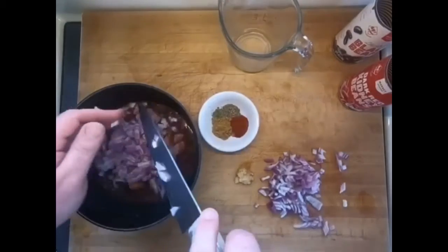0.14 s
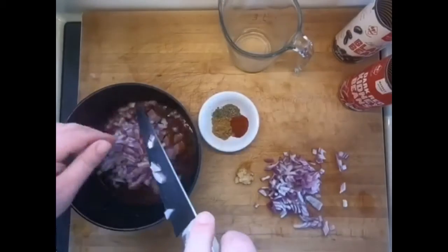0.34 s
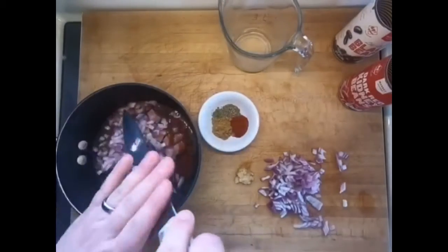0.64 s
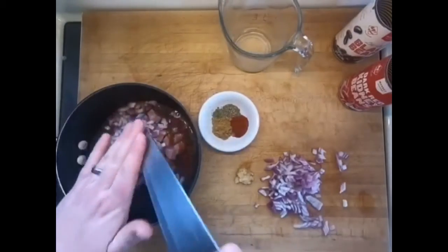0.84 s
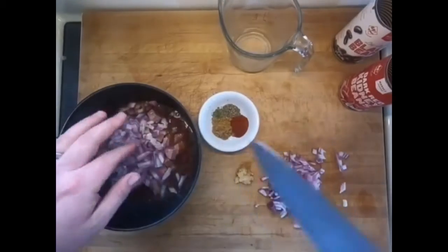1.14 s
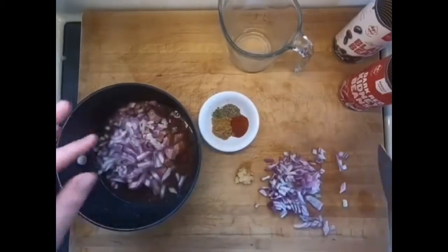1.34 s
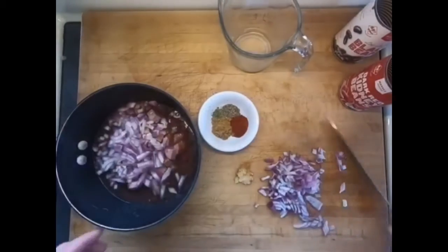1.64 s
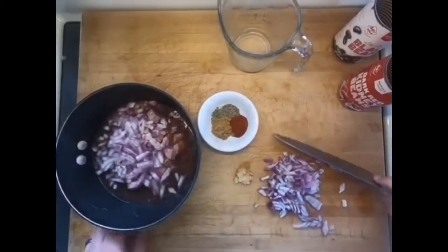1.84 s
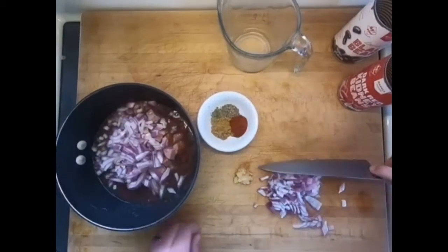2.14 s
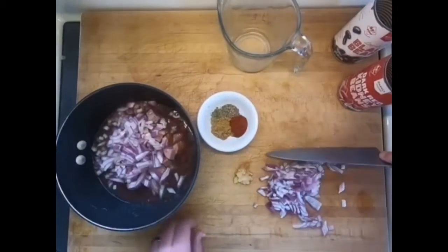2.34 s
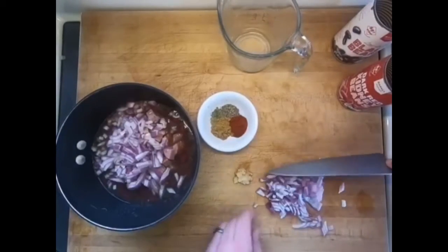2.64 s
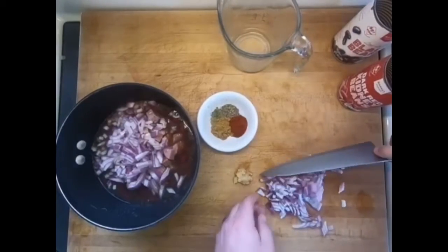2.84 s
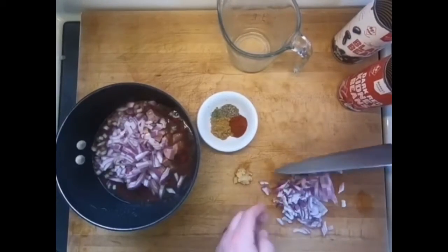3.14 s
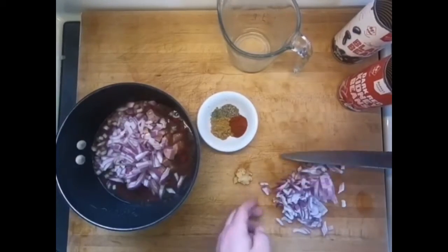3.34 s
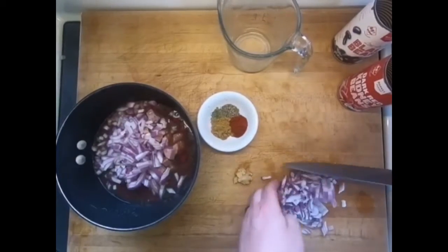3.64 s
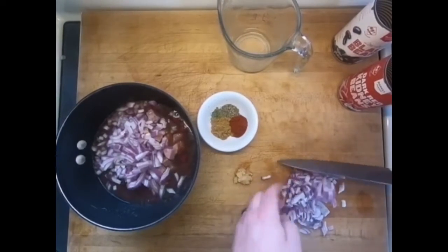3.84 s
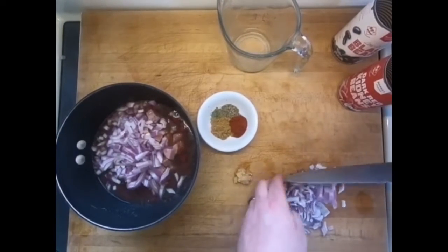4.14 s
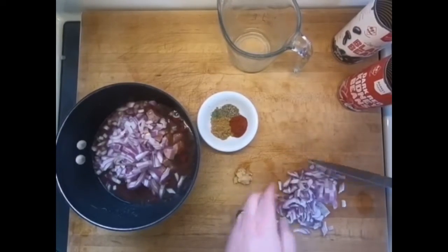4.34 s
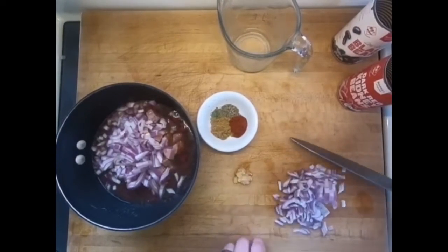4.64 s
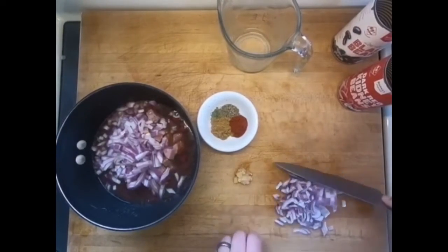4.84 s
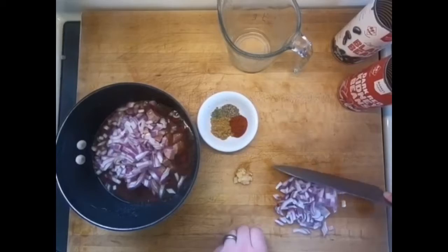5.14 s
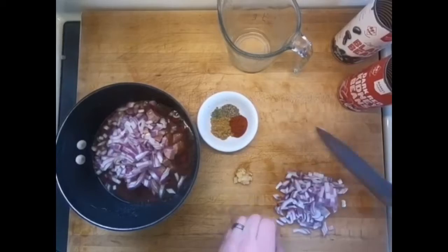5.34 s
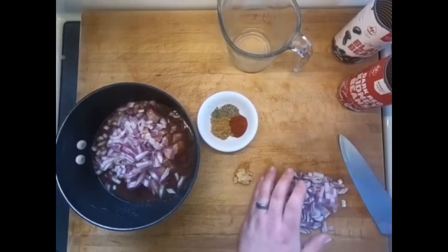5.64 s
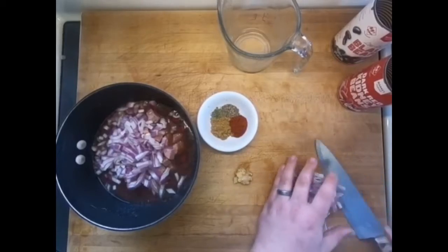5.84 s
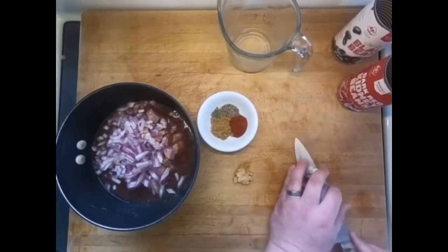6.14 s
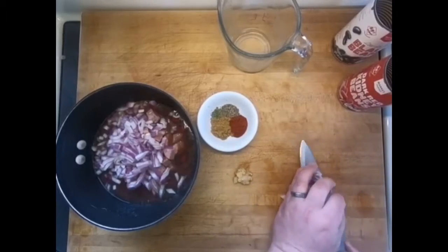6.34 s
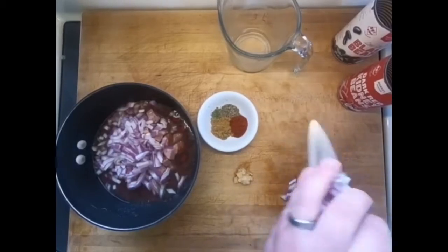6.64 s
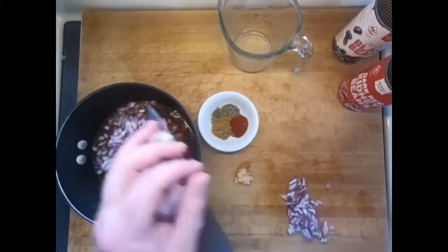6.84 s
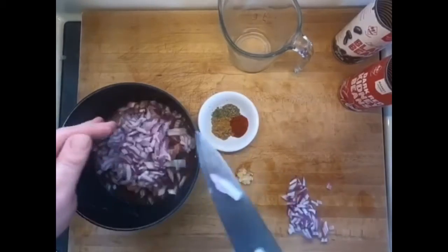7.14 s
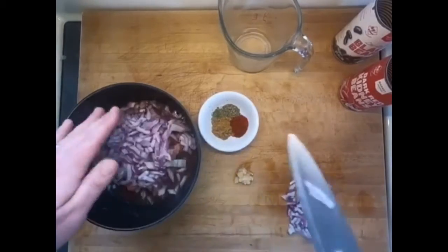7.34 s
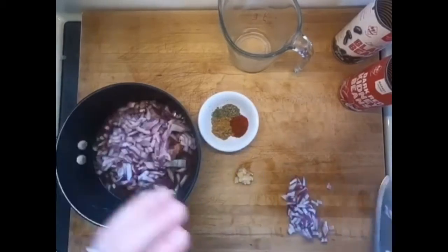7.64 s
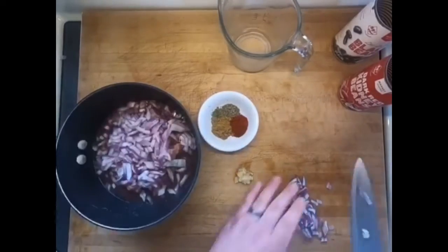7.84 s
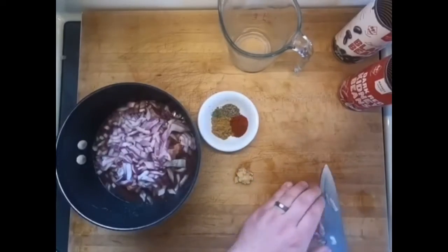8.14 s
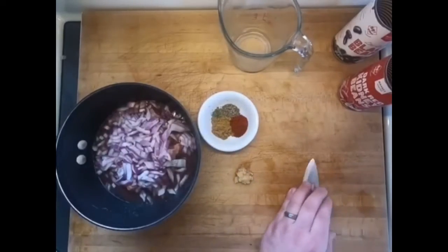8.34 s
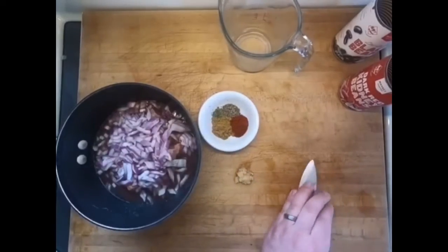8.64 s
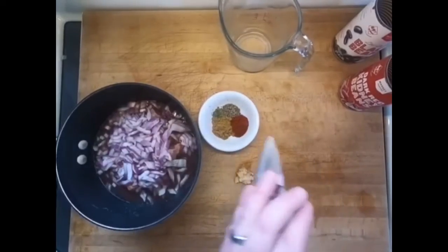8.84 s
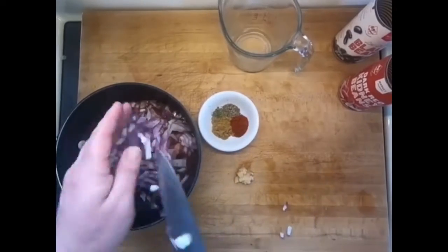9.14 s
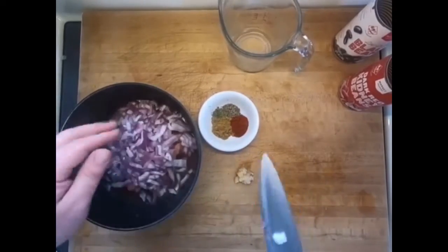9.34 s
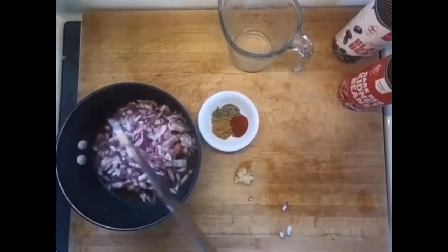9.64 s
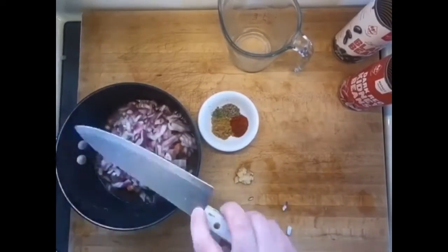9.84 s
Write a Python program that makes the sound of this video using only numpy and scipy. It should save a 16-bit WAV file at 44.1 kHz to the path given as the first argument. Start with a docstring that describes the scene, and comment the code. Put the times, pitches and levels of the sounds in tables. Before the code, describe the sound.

Soft hand rustling and scattered bright ticks come first as onion bits are brushed off a blade into a pan. Then a hard wooden knock starts a run of raspy, faintly ringing knife sweeps across a board, broken by sharper knocks. After a scoop and more pan ticks, another knock and gritty scrape follow, ending in quick clicks. Close microphone, small quiet kitchen, short tail.

```python
"""A kitchen knife lands on a wooden board and sweeps chopped onion together, stroke after stroke.
Each landing is a burst of noise ringing the board; each sweep is thousands of tiny slips that ring the blade.
Hands rustle as softer slips, onion bits tick as short clicks that can ring a pot, and the counter thuds as
dull noise. Thin swishes, a falling squeak and a faint room tone fill in.
One close microphone hears it all in a small quiet kitchen, which adds a short tail to the blows."""
import sys
import numpy as np
from scipy import signal
from scipy.fft import rfft, irfft
from scipy.io import wavfile

SR = 44100
rng = np.random.default_rng(int(sys.argv[2]) if len(sys.argv) > 2 else 0)


def store_wav(level_fs):
    """Save 16-bit WAV to argv[1]."""
    pcm = np.round(np.clip(np.atleast_2d(level_fs), -1, 1) * 32767)
    wavfile.write(sys.argv[1], SR, pcm.T.astype(np.int16))


N = 440559   # length in samples
STEP = 40   # slow curves are worked out once every 40 samples

# Steady room tone. Each row: frequency in Hz, strength in dB per Hz (outline only).
AIR_OUTLINE = [(12, -24.5), (25, -13.5), (60, -11.5), (100, -16.5), (142, -3.5), (182, 2), (428, -19.5),
               (523, -15), (762, -10), (1030, -19), (1600, -22), (2670, -16), (3520, -5), (4760, -21),
               (6770, -21), (8070, -31), (10000, -34), (11800, -40.5), (12600, -77.5)]
# Knife strokes over the board. Each row: peak time in s, rise in s, fall in s, level in dB, brightness in dB,
# singing pitch in Hz, singing level in dB against the hiss.
STROKES = [(1.81, 0.11, 0.13, -34.5, -1.5, 2206, -6), (2.11, 0.053, 0.081, -35, -1, 6834, -11.5),
           (2.2, 0.13, .09, -32.5, 0, 4330, -12.5), (2.569, 0.085, 0.1, -36.5, 1.5, 3180, -5.5),
           (3.0, 0.12, 0.21, -46, 6, 2408, -15), (3.558, 0.076, 0.062, -34.5, 1.5, 2190, -7.5),
           (4.121, 0.045, 0.08, -39, -2.5, 3770, -11.5), (4.822, 0.1, 0.12, -39, -2, 1424, -5.5),
           (4.879, 0.24, 0.076, -36.5, 2, 5530, -12), (5.191, 0.062, 0.046, -34.5, -1, 4250, -8),
           (5.668, 0.044, 0.16, -39, -5.5, 3595, 1), (5.89, 0.15, 0.16, -41.5, 1.5, 3242, -5.5),
           (6.008, .07, 0.057, -42.5, -2.5, 1636, -7.5), (8.022, 0.18, .12, -36, -1, 3350, -4),
           (8.29, 0.14, 0.19, -46.5, 1.5, 3326, -6.5), (8.432, 0.0088, 0.054, -42.5, 9, 5880, 3.5),
           (8.46, 0.045, 0.041, -34, 6, 3840, -5.5), (8.501, 0.015, 0.043, -44, 5.5, 1887, -6)]
# Hands wiping and onion sliding. Each row: peak time in s, rise in s, fall in s, level in dB, brightness in dB.
RUSTLES = [(0.0, .1, 0.097, -51, 10), (0.138, 0.04, 0.077, -39.5, 5.5), (.2, 0.035, 0.093, -51, -6.5),
           (.8, 0.12, 0.33, -56.5, 5), (.97, 0.22, 0.25, -58, 2.5), (1.6, 0.067, 0.3, -60, -3),
           (1.95, 0.4, 0.23, -49, -8), (2.4, 0.86, 0.66, -54, -3.5), (2.68, 0.11, 0.095, -52, 7.5),
           (2.85, 0.027, 0.29, -54.5, -4), (3.1, 0.094, 0.13, -51.5, -6), (3.38, 0.059, 0.04, -56, -6.5),
           (3.68, 0.16, 0.19, -62, -8.5), (3.8, 0.14, 0.059, -67, 13.5), (4.03, 0.062, 0.059, -49.5, -6.5),
           (4.251, 0.28, 0.062, -52.5, -3.5), (5.05, .3, 0.46, -56, -2.5), (5.3, 0.14, 0.15, -53, 2.5),
           (6.12, 0.13, 0.13, -54.5, -1.5), (6.31, 0.11, 0.16, -56.5, 9.5),
           (6.42, 0.11, 0.077, -59.5, 14.5), (6.85, 0.23, .4, -61.5, 1), (7.0, 0.18, 0.085, -61, 12),
           (7.13, 0.12, 0.1, -47.5, 4.5), (8.39, 0.09, 0.063, -55, 14), (8.6, 0.3, 0.65, -63, 8),
           (9.15, 0.18, 0.19, -60, 9), (9.28, 0.078, 0.13, -51, 2), (9.46, 0.038, 0.042, -79, 0),
           (9.73, .2, 0.41, -54, -3.5)]
# Bending modes of the blade. Each row: frequency in Hz, width in Hz, level in dB (wider modes get more).
BLADE_MODES = [(770, 50, -13), (1405, 40, -8), (1750, 45, -10), (2170, 45, -6), (2420, 50, -9),
               (2830, 60, -12), (3230, 50, -6), (3605, 70, 3), (4285, 70, -4), (4720, 60, -12),
               (5440, 60, -8), (5910, 90, -15), (6270, 100, -14), (6740, 110, -11), (7460, 110, -20),
               (8050, 60, -26), (9310, 60, -32), (11300, 150, -44), (13100, 90, -38), (13900, 300, -50),
               (14900, 80, -38)]
# Colour of direct rubbing. Each row: frequency in Hz, strength in dB per Hz (outline only).
RUB_OUTLINE = [(59, -72.5), (100, -31.5), (147, 5.5), (251, -3), (513, -9), (768, -3.5), (1070, -9.5),
               (1380, -11.5), (2000, -15), (2110, -10), (2990, -11), (3340, -4.5), (6840, -28),
               (8070, -31.5), (10500, -66.5), (17800, -120)]
# Onion bits, ring and fingers ticking on blade and pot. Each row: time in s, level in dB, pitch in Hz.
TICKS = [(0.149, -48, 3000), (0.183, -31, 4200), (0.2094, -44, 2960), (0.272, -42.5, 5050),
         (0.392, -46.5, 1090), (0.4531, -34, 1890), (0.5284, -51.5, 1270), (0.623, -45, 740),
         (0.7188, -29.5, 1920), (0.9254, -39.5, 1520), (1.0836, -46.5, 2970), (2.43, -44.5, 596),
         (2.8335, -33, 3700), (2.8579, -42, 3500), (3.3447, -49, 2500), (4.279, -40, 5500),
         (5.601, -43, 4000), (6.311, -38.5, 5470), (6.49, -45, 5500), (6.548, -50.5, 5500),
         (6.69, -51.5, 1780), (6.7138, -41, 5000), (6.7914, -33.5, 2780), (6.8758, -46, 2000),
         (7.185, -46, 1800), (7.2678, -35.5, 4560), (8.842, -47, 4500), (8.873, -33, 5500),
         (8.952, -35.5, 4630), (8.986, -40, 5000), (9.103, -46, 4000), (9.1448, -50.5, 805),
         (9.2527, -39.5, 2930), (9.3208, -46, 3500), (9.3583, -44, 3500), (9.4015, -31.5, 3560),
         (9.4194, -44.5, 1200), (9.4416, -28, 2640)]
# A thin high swish while the knife is carried. Each row: start in s, end in s, pitch in Hz, level in dB.
SWISHES = [(1.148, 1.307, 6280, -62), (1.32, 1.43, 6070, -64)]
# Knife landing on the board. Each row: time in s, board level in dB, edge crack level in dB,
# crack pitch in Hz, low thump level in dB.
KNOCKS = [(1.641, -11, -23, 2820, -24), (2.486, -15.5, -14.5, 3620, -33), (2.9393, -23.5, -21, 3380, -37.5),
          (2.982, -27, -33, 3300, -53), (3.4712, -26.5, -17.5, 3390, -35.5),
          (3.9802, -32.5, -42, 2640, -36.5), (4.6389, -13.5, -17.5, 2750, -25),
          (5.1259, -28, -18.5, 2380, -29), (5.6122, -44, -35, 3630, -28.5), (5.623, -25, -7, 3760, -27.5),
          (7.8392, -25.5, -27.5, 3210, -29.5)]
# Modes of the wooden board. Each row: frequency in Hz, level in dB, time in s to fade by 60 dB.
BOARD_MODES = [(470, -8, .04), (597, -3, .04), (720, -1, .05), (937, -1, .04), (1240, -4, .035),
               (1420, -7, .035), (1720, -7, .03), (2230, -8, .03), (2640, -8, .03), (3290, -10, .025)]
# Colour of the edge crack. Each row: frequency in Hz, strength in dB per Hz (outline only).
CRACK_OUTLINE = [(300, -22), (1300, -6), (3000, 11), (4500, -6), (7000, 6.5), (8300, -18), (11000, -93)]
# Modes of the counter under the board. Each row: frequency in Hz, level in dB, time in s to fade by 60 dB.
COUNTER_MODES = [(155, -1, .13), (200, 0, .13), (240, -4, .1), (310, -6, .08)]
# Bumps against the counter. Each row: time in s, level in dB of each band, highest pitch shaken in Hz.
BUMPS = [(1.96, -61, 50.4), (4.151, -50, 68.4), (6.2723, -40, 650), (8.599, -72.5, 40), (8.93, -71, 35.3)]
# A finger on wet steel. In order: start in s, end in s, first pitch in Hz, last pitch in Hz, level in dB.
SQUEAK = (8.99, 9.1, 1800, 1350, -66)

AIR_DB = -65
SWELL_POWER = 1.093   # rise and fall are the times to 20 dB down; 1 = pointed top, 2 = round top
# Board rumble and bright fizz against the hiss; brightness tips one down, the other up.
RUMBLE_DB, FIZZ_DB = -10.5, -8.5
RINGING_UPRIGHT, RINGING_FLAT = 0.7, 0.26   # share of a stroke's power that is blade ring
FLAT_FROM_S, FLAT_TO_S = 5.5, 8.4   # the blade lies flat under the onion, which damps it
OFF_BOARD_DB = -12   # once the blade is tilted up again, its rasp hardly reaches the wood
SING_T60_S = 0.045
CRACKLE_PER_S, CRACKLE_DB = 120, -12   # onion bits snapping loose under the hands, against the rustle
TICK_CYCLES, TICK_TAIL = 43.5, 0.18   # a tick fades by 60 dB in this many cycles; share of its longer tail
POT_HZ, POT_T60_S, POT_SHARE, POT_BELOW_HZ = 702, 0.073, 0.65, 1530
ROOM_T60_S, ROOM_DB = 0.34, -10
KNOCK_THUD_DB, KNOCK_THUD_HZ = -29, 72   # each knock shakes the counter too, against its thump
THUD_T60_S, THUD_LOWEST_HZ = 0.44, 50   # fade time at 100 Hz, shorter above
CUTOFF_HZ = 15300   # from here up, the sound is at least 70 dB down


def amp(db):
    """Turn dB into a gain."""
    return 10 ** (np.asarray(db) / 20)


def rms_one(x):
    """Scale to an average (rms) strength of 1."""
    return x / np.sqrt(np.mean(x ** 2) + 1e-20)


def peak_one(x):
    """Scale to a peak of 1."""
    return x / np.abs(x).max()


def band(x, low_hz, high_hz):
    """Keep only the pitches between two limits (Butterworth band-pass)."""
    return signal.sosfilt(signal.butter(3, [low_hz, high_hz], "band", fs=SR, output="sos"), x)


def coloured(x, outline):
    """Filter to a dB-per-Hz outline, with no sound ahead of its cause (minimum phase)."""
    hz, db = np.transpose(outline)
    grid_hz = np.maximum(np.arange(2049) * SR / 4096, 1)
    gain = amp(np.interp(np.log(grid_hz), np.log(hz), db))
    cepstrum = irfft(np.log(gain))
    # Folding the second half onto the first gives minimum phase.
    cepstrum[1:2048] *= 2
    cepstrum[2049:] = 0
    response = irfft(np.exp(rfft(cepstrum)))
    return signal.fftconvolve(x, response)[:len(x)]


def every_sample(curve):
    """Fill in a slow curve between its steps."""
    return np.interp(np.arange(N) / STEP, np.arange(len(curve)), curve)


def drift(rate_hz):
    """A slow random wander of spread 1: noise smoothed twice."""
    r = np.exp(-2 * np.pi * rate_hz * STEP / SR)
    noise = rng.standard_normal(N // STEP + 2002)
    slow = signal.lfilter([1], [1, -2 * r, r * r], noise)[2000:]   # skip the filter's warm-up
    return every_sample(rms_one(slow))


def ring(x, hz, t60):
    """A resonance: a unit click sets a sine of height 1 ringing, 60 dB down after t60 seconds."""
    r = amp(-60 / (t60 * SR))
    w = 2 * np.pi * hz / SR
    return signal.lfilter([0, np.sin(w)], [1, -2 * r * np.cos(w), r * r], x + 1e-18)


def burst(t60, size=12000):
    """Noise that starts at once and dies away."""
    return rng.standard_normal(size) * amp(-60 * np.arange(size) / SR / t60)


def add(out, s, sound):
    """Mix a sound in at time s."""
    i = round(s * SR)
    out[i:i + len(sound)] += sound[:N - i]


def swells(rows):
    """Slow gain of each row: up to its peak and down again."""
    peak, rise, fall, db = np.array([row[:4] for row in rows]).T[:, :, None]
    t = np.arange(0, N + STEP, STEP) / SR - peak
    distance = np.abs(t / np.where(t < 0, rise, fall))
    return amp(np.maximum(db - 20 * distance ** SWELL_POWER, -120))


def total(gains, db=0):
    """Unrelated sounds add as powers; the sum is given for every sample."""
    return every_sample(np.sqrt(np.sum((gains * amp(db)) ** 2, axis=0)))


def grains(per_s, spread_db, lumpy_db):
    """Uneven slips of an edge over fibres: random clicks that come in lumps; rms 1."""
    sizes = amp(spread_db * np.minimum(rng.exponential(1, N), 5))
    signs = rng.choice([-1, 1], N)
    happens = rng.random(N) < per_s / SR
    return rms_one(sizes * signs * happens * amp(lumpy_db * drift(22.7)))


def room_tone():
    """Steady coloured noise whose level wanders slightly."""
    noise = coloured(rng.standard_normal(N), AIR_OUTLINE)
    return amp(AIR_DB + 0.5 * drift(6)) * rms_one(noise)


def blade_ring():
    """Slips ring the blade's bending modes, each waxing and waning as the contact moves."""
    slips = grains(per_s=6000, spread_db=3.0, lumpy_db=1.5)
    blade = np.zeros(N)
    for k, (hz, width_hz, db) in enumerate(BLADE_MODES):
        t60 = np.log(1000) / (np.pi * width_hz)   # a narrow mode rings long
        push = slips * amp(4 * drift(11))
        mode = ring(ring(push, hz, t60), hz, t60 / 4)
        sign = (-1) ** k   # neighbouring modes move in opposite directions
        blade += sign * amp(db) * np.sqrt(width_hz) * rms_one(mode)
    return blade


def crackle(rustles):
    """Onion bits snap loose under the hands: sparse clicks that follow the rustle."""
    snaps = coloured(grains(CRACKLE_PER_S, spread_db=2, lumpy_db=2.5), RUB_OUTLINE)
    return total(rustles, CRACKLE_DB) * rms_one(band(snaps, 1500, 7500))


def singing(strokes):
    """The edge's chatter locks onto a pitch and sings: noise through one resonance per stroke."""
    out = np.zeros(N)
    evening = 2 * np.sqrt(np.log(1000) / (SING_T60_S * SR))   # brings the rung noise back to rms 1
    for gain, (*_, hz, db) in zip(strokes, STROKES):
        noise = rng.standard_normal(N) * total(gain[None], db)
        out += ring(noise, hz, SING_T60_S) * evening
    return out


def rubbing():
    """Slips of hands, onion and knife sound directly; under a knife stroke they also ring the blade."""
    strokes, rustles = swells(STROKES), swells(RUSTLES)
    gains = np.vstack([strokes, rustles])
    bright_db = np.array([[row[4]] for row in STROKES + RUSTLES])
    stroke_off_db = [[OFF_BOARD_DB * (row[0] > FLAT_TO_S)] for row in STROKES]
    off_board_db = np.array(stroke_off_db + [[0]] * len(RUSTLES))

    blade = blade_ring()
    direct = coloured(grains(per_s=8000, spread_db=3.5, lumpy_db=2.0), RUB_OUTLINE)
    t = np.arange(N) / SR
    flat = (t > FLAT_FROM_S) & (t < FLAT_TO_S)
    stroke_share = (total(strokes) / total(gains)) ** 2
    ringing = np.where(flat, RINGING_FLAT, RINGING_UPRIGHT) * stroke_share

    bands = [(RUMBLE_DB - bright_db + off_board_db, 120, 1600),   # rumble
             (0, 1600, 4900),   # hiss
             (FIZZ_DB + bright_db, 4900, 15200)]   # fizz
    out = np.zeros(N)
    for db, low_hz, high_hz in bands:
        ringing_part = np.sqrt(ringing) * rms_one(band(blade, low_hz, high_hz))
        direct_part = np.sqrt(1 - ringing) * rms_one(band(direct, low_hz, high_hz))
        out += total(gains, db) * (ringing_part + direct_part)
    return out + crackle(rustles) + singing(strokes)


def ticks():
    """A dry click around its pitch with a short tail; dull ones also ring the pot."""
    out = np.zeros(N)
    size = 6000
    onset = np.minimum(np.arange(size) / (.001 * SR), 1)   # soft bits take a millisecond to land
    for s, level_db, hz in TICKS:
        t60 = TICK_CYCLES / hz
        noise = onset * (burst(t60, size) + TICK_TAIL * burst(4 * t60, size))
        click = peak_one(band(noise, hz / 1.72, min(hz * 1.65, 7600)))
        pot_share = POT_SHARE / (1 + (hz / POT_BELOW_HZ) ** 4)   # bright ticks hardly ring it
        pot = pot_share * peak_one(ring(burst(0.005, size), POT_HZ, POT_T60_S))
        add(out, s, amp(level_db) * (click + pot))
    return out


def kitchen(x):
    """Echoes blur into a tail: dying noise, duller with time, after a short gap."""
    bright = burst(0.37 * ROOM_T60_S, size=24000)
    dull = signal.lfilter([.3], [1, -.7], burst(ROOM_T60_S, size=24000))
    tail = band(np.concatenate([np.zeros(150), bright + 0.83 * dull]), 130, 6400)
    return signal.fftconvolve(x, tail / np.sqrt(np.sum(tail ** 2)))[:N]


def swish():
    """Short swells of narrow treble noise as the knife is carried."""
    out = np.zeros(N)
    for start, end, hz, db in SWISHES:
        size = round((end - start) * SR)
        noise = rms_one(band(rng.standard_normal(size), hz / 1.1, hz * 1.12))
        add(out, start, amp(db) * np.hanning(size) * noise)
    return out


def knocks():
    """The edge lands: a crack, a dry wooden rattle through the board's modes, and a thump."""
    out = np.zeros(N)
    for s, board_db, crack_db, crack_hz, thump_db in KNOCKS:
        touch = burst(t60=0.074)
        board = np.zeros(len(touch))
        for hz, db, t60 in BOARD_MODES:
            board += amp(db + rng.normal(0, 1)) * ring(touch, hz, t60)   # no two landings alike
        rattle = band(burst(t60=0.035), 395, 3460)
        wood = 0.37 * peak_one(board) + peak_one(rattle)

        touch[700:] = 0   # only the first moments push the heavy counter
        thump = sum(amp(db) * ring(touch, hz, t60) for hz, db, t60 in COUNTER_MODES)

        snap = burst(t60=0.0063) + 0.37 * burst(t60=0.07)
        pitched = peak_one(ring(snap, crack_hz, .009))
        crack = pitched + .7 * peak_one(coloured(snap, CRACK_OUTLINE))

        add(out, s, amp(board_db) * wood)
        add(out, s, amp(crack_db) * peak_one(crack))
        add(out, s, amp(thump_db) * peak_one(thump))
    return out


def thuds():
    """The counter shakes: dull noise in bands from the highest pitch down; low bands swell and fade slower."""
    out = np.zeros(N)
    size = 30000
    knock_bumps = [(row[0], row[4] + KNOCK_THUD_DB, KNOCK_THUD_HZ) for row in KNOCKS]
    for s, level_db, hz in BUMPS + knock_bumps:
        while True:   # the highest band always sounds, even below the lowest pitch
            swell = 1 - np.exp(-np.arange(size) * hz / SR)   # grows over about one cycle
            t60 = THUD_T60_S * (100 / hz) ** 0.49
            noise = band(swell * burst(t60, size), hz / 1.8, hz * 1.8)
            add(out, s, amp(level_db) * peak_one(noise))
            hz /= 3.3
            if hz < THUD_LOWEST_HZ:
                break
    return out


def squeak():
    """A finger on wet steel: a wavering tone that falls in pitch."""
    start, end, from_hz, to_hz, db = SQUEAK
    size = round((end - start) * SR)
    fall = np.linspace(1, 0, size) ** 2
    hz = to_hz + (from_hz - to_hz) * fall + 45 * drift(70)[:size]
    tone = np.sin(2 * np.pi * np.cumsum(hz) / SR)
    loudness = np.linspace(.3, 1, size) * signal.windows.tukey(size, .4)
    out = np.zeros(N)
    add(out, start, amp(db) * loudness * tone)
    return out


def scene():
    """Everything reaches the one microphone, heard alike on both channels."""
    blows = band(knocks() + band(ticks(), 300, 9700), 190, 5850)
    near = blows + rubbing() + squeak()
    room = amp(ROOM_DB) * kitchen(blows)
    mono = near + room + thuds() + swish() + room_tone()
    return np.array([mono, mono])


def record(dry):
    """A steep filter cuts off the top of the treble."""
    return signal.sosfilt(signal.cheby2(12, 70, CUTOFF_HZ, fs=SR, output="sos"), dry)


dry = scene()
out = record(dry)
store_wav(out)
```